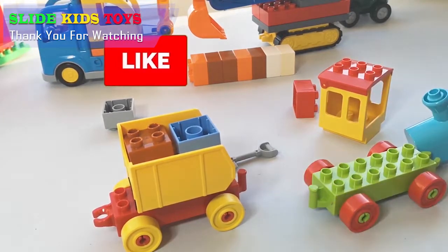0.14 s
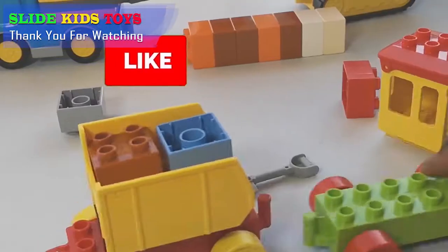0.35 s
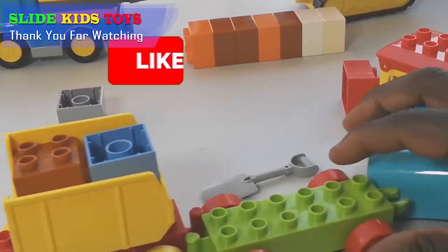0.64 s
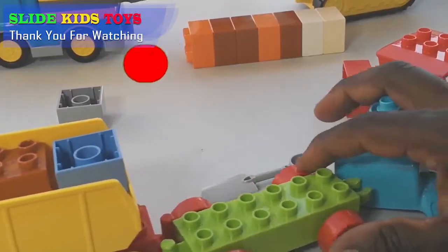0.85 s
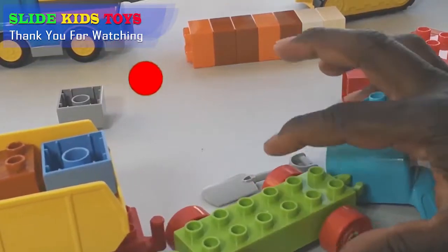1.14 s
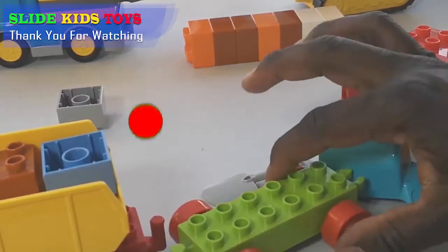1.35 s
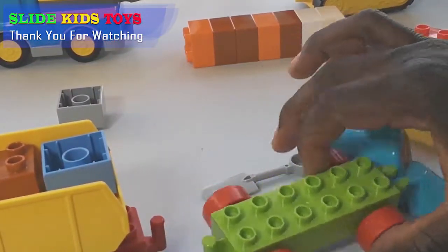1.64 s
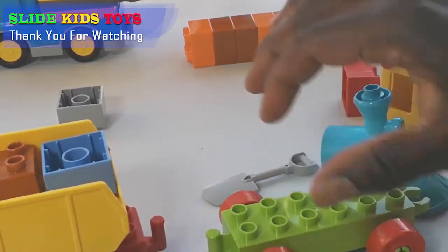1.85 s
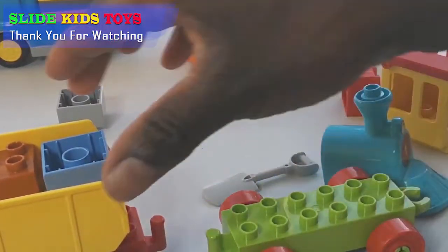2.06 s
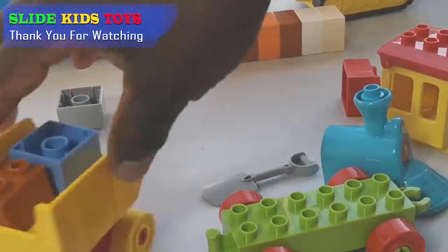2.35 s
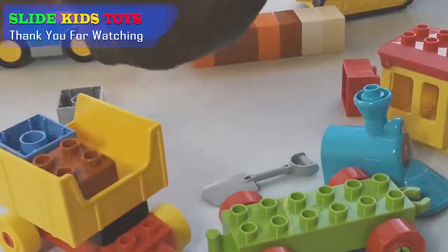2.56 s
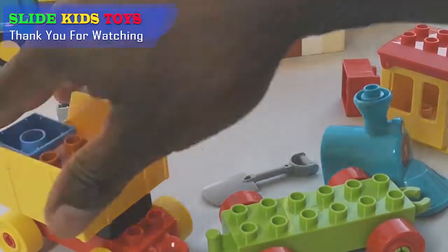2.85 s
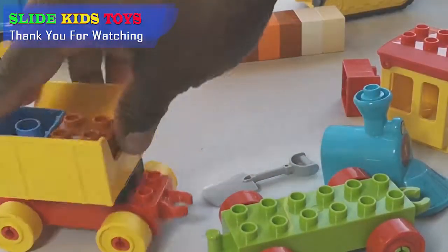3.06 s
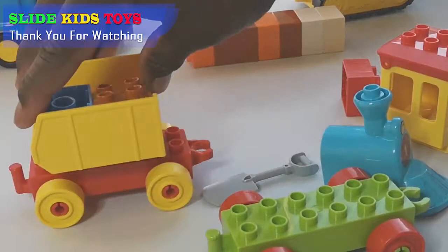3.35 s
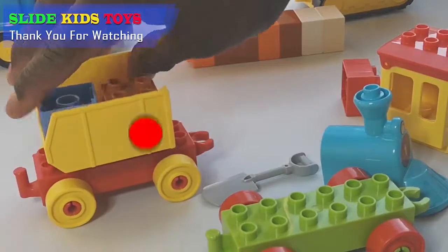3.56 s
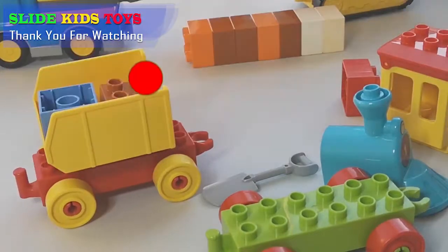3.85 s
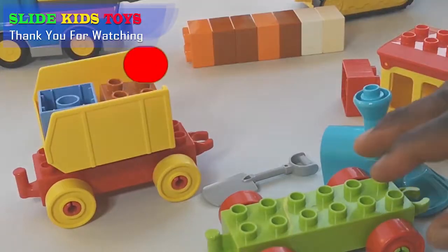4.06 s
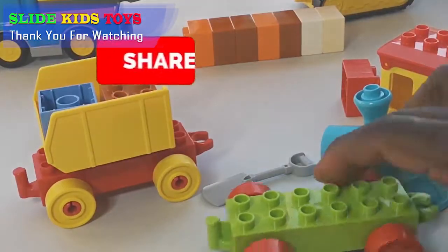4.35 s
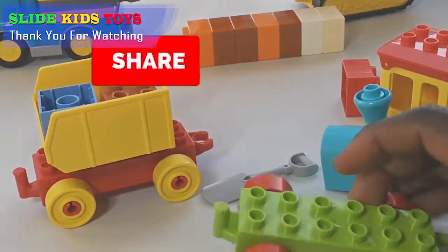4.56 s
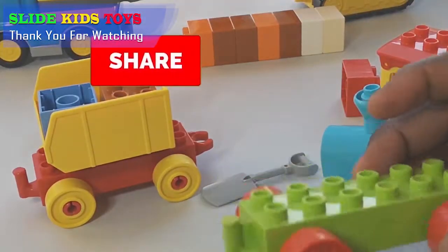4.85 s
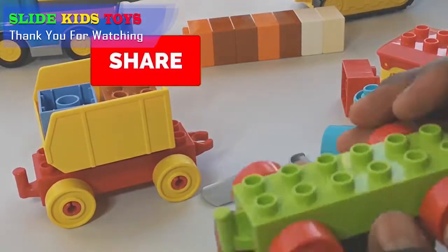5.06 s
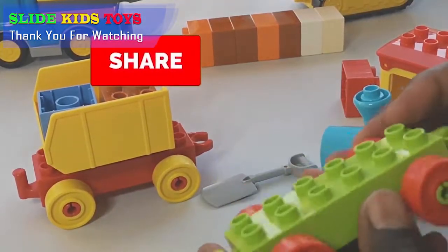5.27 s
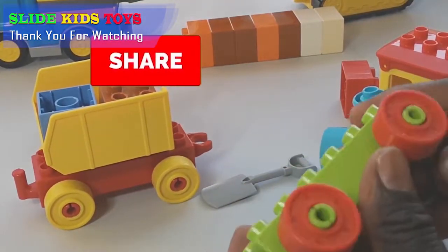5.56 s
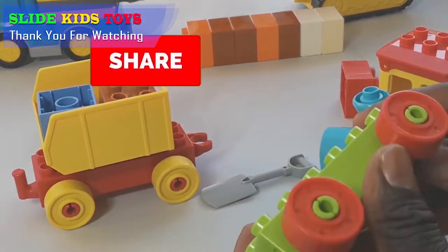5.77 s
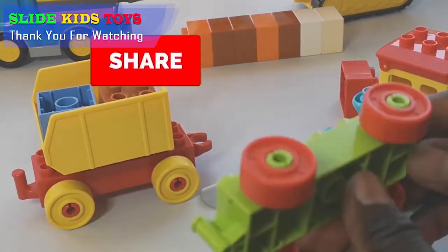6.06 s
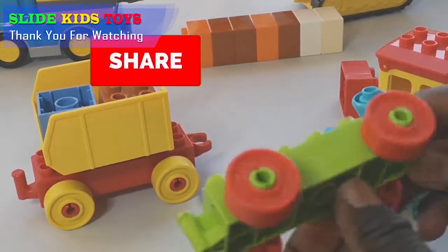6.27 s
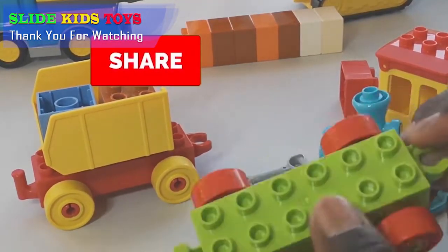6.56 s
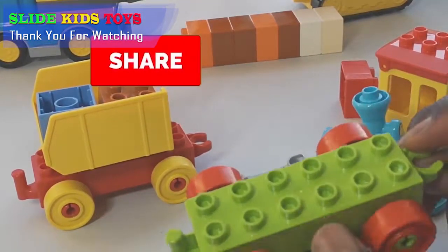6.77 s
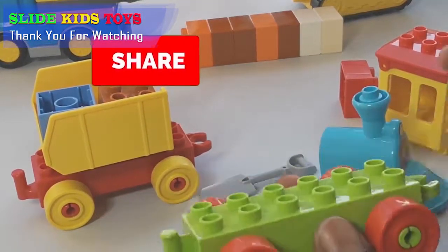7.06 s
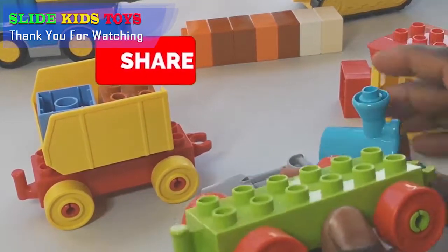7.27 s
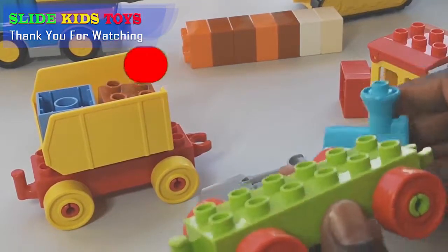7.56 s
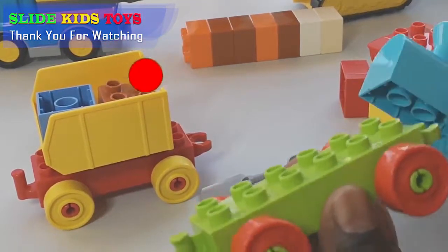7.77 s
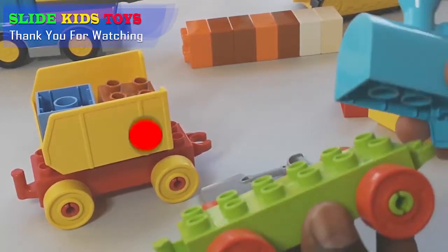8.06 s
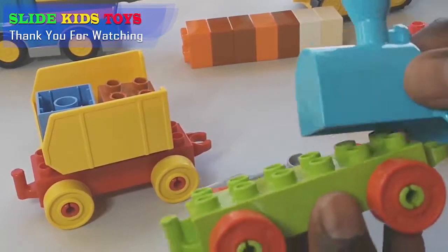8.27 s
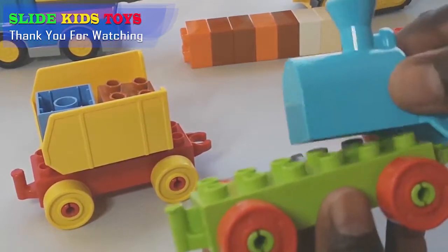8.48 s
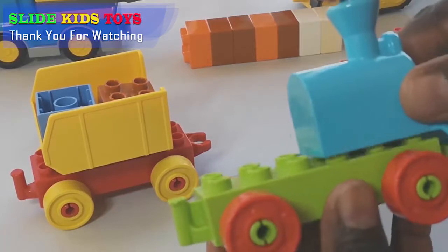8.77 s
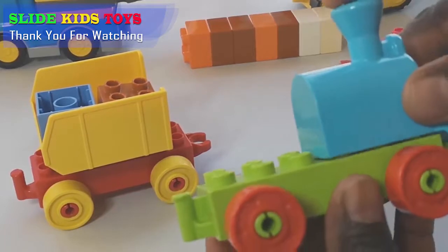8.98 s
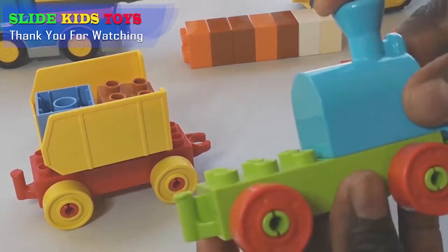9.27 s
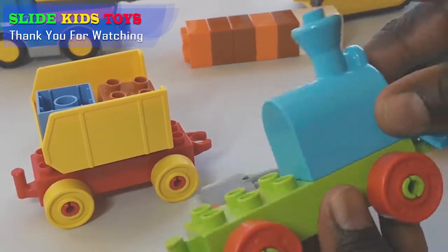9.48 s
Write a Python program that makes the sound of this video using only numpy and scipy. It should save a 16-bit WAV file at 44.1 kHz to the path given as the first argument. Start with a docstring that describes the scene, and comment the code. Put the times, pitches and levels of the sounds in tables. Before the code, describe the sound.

A tiny cut-off low thud, then silence for over half a second. Abruptly the room opens and hands handle hollow plastic toy pieces on a table: scrapes, sharp knocks and quick rattling clusters, pauses, then brighter clicks as pieces are turned and pressed together. Close stereo microphone, small room with short reflections, faint hiss and low rumble underneath.

```python
"""A cut-off thud, then silence until the sound opens on hands handling hollow plastic toy pieces.
They knock, turn and drag the pieces on a table in a small room, close to a pair of microphone ports.
Each knock rings the thin plastic walls; dragging feeds dense grit into walls and table top; fingertips rub.
A low rumble, a hiss and a faint wavering whine lie below."""
import sys
import numpy as np
from scipy import signal
from scipy.fft import rfft, irfft
from scipy.io import wavfile
from scipy.ndimage import map_coordinates

SR = 44100
rng = np.random.default_rng(int(sys.argv[2]) if len(sys.argv) > 2 else 0)


def generate_wav(sig):
    """Save sig (samples, or channels by samples) to the path in sys.argv[1] as 16-bit PCM at SR."""
    pcm = np.round(np.clip(np.atleast_2d(sig).T, -1, 1) * 32767).astype(np.int16)
    wavfile.write(sys.argv[1], SR, pcm)


N = 424683

# background hiss spectrum, relative: pitch_hz, density_db_per_hz
HISS_SPECTRUM = [(32, -32), (55, -19), (92, -21), (155, -11.5), (323, -40), (471, -33.5), (811, -33),
                 (1990, -31.5), (3850, -42), (6470, -45.5), (9000, -45.5), (12500, -60.5), (15500, -72.5)]
# left-right likeness of the hiss: pitch_hz, correlation
HISS_LIKENESS = [(60, 6), (180, 0.64), (550, -1), (1650, 0.13), (4970, -0.1), (15000, -0.3)]
# rumble level over time: time_s, rms_db
RUMBLE_LEVELS = [(0.63, -55.5), (3.26, -60), (4.54, -53.5), (7.15, -52.5), (7.4, -41.5), (7.6, -58),
                 (8.25, -46.5), (8.9, -53), (9.1, -51.5), (9.63, -58.5)]
# decay of the room: pitch_hz, t60_s
ROOM_DECAY = [(250, 0.05), (1500, 0.23), (5000, 0.25), (9000, 0.22), (14000, 0.23)]
# where the hands work: time_s, left_late_ms
HAND_PLACES = [(0.6, 0.068), (1.9, 0.055), (2.2, -0.2), (3.9, 0.053), (4.2, 0.16), (5.0, -0.059),
               (6.5, -0.0031), (7.2, 0.063), (9.6, 0.021)]
# modes of the plastic walls, undamped by hands: pitch_hz, level_db, t60_s
WALL_MODES = [(870, -37, 0.045), (1176, -39, 0.032), (1385, 7, 0.02), (1655, -9.5, 0.012),
              (2000, 10.5, 0.0082), (2519, -4, 0.26), (2833, -8.5, 0.29), (3198, 1.5, 0.26),
              (3460, -5, 0.067), (3850, 10, 0.014), (3977, 8, 0.023), (4300, -45, 0.0025), (5320, 0, 0.037),
              (5566, 9, 0.077), (5900, -12, 0.0283), (7750, -13, 0.0026), (7074, 12, 0.055),
              (8580, 9, 0.02), (11900, -13.5, 0.033)]
# modes of the table top, undamped by hands: pitch_hz, level_db (unused), t60_s
TABLE_MODES = [(115, -8.5, 0.61), (150, -7.5, 0.047), (224, -7, 0.05), (239, 2.8, 0.15), (294, 6.5, 0.37),
               (380.7, 4, 0.11), (473, -11.5, 0.031), (668, -25, 0.14), (868, -18, 0.021)]
# how hard grit drives each pitch, relative: pitch_hz, drive_db_per_hz
GRIT_DRIVE = [(90, -28), (236, -0.5), (325, -1.5), (543, -17), (1690, -6), (2710, -12), (7730, -17.5),
              (9800, -16), (15000, -28.5)]
# strokes of dragging, rolling and fingering, levels before trim:
# full_s (rise complete), hold_s, fade_db_per_s, walls_db, treble_db, table_db
STROKES = [(0.595, 0.007, 55, -35, -45.5, -41.5), (1.279, 0.022, 274, -36, -45.5, -41),
           (1.336, 0.13, 32, -63, -76, -49.5), (1.69, 0.076, 328, -45.5, -69, -38),
           (1.777, 0.0033, 600, -23, -35, -54), (1.81, 0.048, 492, -44.5, -46.5, -40.5),
           (1.968, 0.084, 282, -75, -57, -82), (2.294, 0.18, 304, -37.5, -46, -38),
           (2.515, 0.053, 302, -30.5, -36.5, -35.5), (2.6, 0.067, 706, -39.5, -55, -42),
           (2.95, 0.095, 312, -50, -51, -55), (3.023, 0.15, 139, -39.5, -44.5, -41.5),
           (3.303, 0.071, 408, -57, -62, -45), (3.474, 0.042, 144, -40, -43, -41),
           (4.276, 0.0032, 236, -46.5, -58, -49.5), (4.368, 0.051, 300, -46.5, -60, -55),
           (4.49, 0.012, 154, -43, -63, -44.5), (5.396, 0.088, 252, -63, -54, -63.5),
           (6.051, 0.067, 250, -63, -56, -69), (6.236, 0.011, 149, -61, -54.5, -62),
           (6.474, 0.043, 200, -63, -66, -90), (6.876, 0.097, 254, -51, -55, -71),
           (7.242, 0.019, 197, -52, -53.5, -41), (7.426, 0.025, 300, -43, -45, -66),
           (7.494, 0.053, 495, -67, -63, -46.5), (9.514, 0.0043, 204, -51.5, -45.5, -52.5)]
# strokes that swell in slowly: same columns
SWELLS = [(2.439, 0.018, 300, -30, -35, -54), (3.16, 0.031, 124, -42, -49, -34.5),
          (4.47, 0.016, 301, -40.5, -51, -55), (7.456, 0.0089, 260, -40, -46.5, -40)]
# hands resting on the pieces, before trim: walls_db, treble_db, table_db
RESTING_DB = [-73.5, -81.5, -67.5]
# fingertip rubs on smooth plastic: peak_s, fade_db_per_s, level_db
RUBS = [(9.13, 121, -68), (9.508, 166, -46)]
# knocks, level before trim:
# start_s, peak_db, panel_pitch_hz, panel_re_walls_db, high_modes_db, left_re_right_db
KNOCKS = [(0.87, -48.5, 3600, 19, -15, 16.5), (1.136, -35.5, 1950, 18.5, -20, 1),
          (1.258, -24, 2540, 8, -14.5, 2), (1.2771, -26, 1180, 15, -3, 7), (1.399, -37, 2430, 17, -14, 7.5),
          (1.4296, -32, 2520, 15, -31, -1), (1.5079, -33.5, 2560, 20, -11, 3),
          (1.6847, -25, 1860, 7, -14.5, 7), (1.723, -19, 1650, -5, -26, 1.5),
          (1.734, -31.5, 2500, -5, -9, 8), (1.7735, -12, 1610, -5, -9, -6.5),
          (2.435, -38, 1360, -4, -26, -2.5), (2.5224, -14.5, 2270, 9, -13.5, 9.5),
          (2.661, -33.5, 2270, 11.5, -31, 15), (2.9522, -43, 2240, -1, -38, 28),
          (3.022, -34.5, 2350, 1, -5, 17), (3.028, -31, 2300, 15, -16, -5), (3.037, -33, 2430, 21, -14, 8),
          (3.0625, -19.5, 4160, 13, -6.5, 7), (3.071, -27, 3050, 7, -12, 6),
          (3.4428, -41, 2300, -5, -26, 8.5), (3.467, -32, 2400, -7, -14, 5),
          (3.477, -19, 2460, 10, 1, 20.5), (3.487, -25, 1530, 3.5, -8, 16), (3.519, -23, 1780, 6, -43, 13),
          (3.5684, -35.5, 1630, 1, -13, 16), (3.5916, -31, 2200, 6, -33, 10), (3.623, -36, 1700, 3, -19, 0),
          (3.6543, -35.5, 1830, 8.5, -26, 1), (4.268, -32.5, 2290, 2, -39, 8.5),
          (4.367, -26, 2300, 22, -42, 0), (4.471, -42, 1310, 22, -7, -13), (4.5258, -30.5, 1400, 0, -16, 2),
          (4.573, -35, 1930, 18, -7.5, 10), (4.737, -46, 2540, 25, -13, 6),
          (4.9685, -20, 2430, 7, -20.5, -1), (5.036, -31.5, 2300, 6, -5, 5),
          (5.0473, -27.5, 2600, 12, -18, -4), (5.209, -45.5, 1464, -5, -23, 0),
          (5.42, -19, 1500, 25, 11.5, 1.5), (5.5091, -42, 1840, 1, -15, 0),
          (5.5709, -22, 3140, 10, 27, -0.5), (6.0466, -47, 2900, 18.5, -30, -5),
          (6.094, -26, 2910, 26, 0, 1.5), (6.159, -43.5, 2780, 12, -15, 6), (6.2184, -45, 3020, 4, -24, 7),
          (6.24, -43.5, 2920, 0, 11, 7), (6.479, -45, 2770, -2, -43, 4), (6.529, -44, 2580, 9, -28, 4),
          (6.6278, -13, 2650, 25, -9, 1), (6.8374, -23, 2690, 42, 18, 1),
          (6.8654, -34.5, 2700, 20, -17, 14), (6.884, -19.5, 2630, 11, -8.5, 0),
          (6.9147, -25, 2570, 20, -13, 0), (6.9368, -20, 2630, 11, -20, 2), (6.963, -37, 2600, 13, -2, 3),
          (6.989, -31.5, 2540, 5, -1.5, 9), (7.0008, -31.5, 2340, -4, -22, 1),
          (7.218, -43.5, 3030, 11, -20, 4), (7.245, -34, 1336, -12, -46, 3), (7.465, -30, 1416, 15, -21, 2),
          (7.539, -41.5, 2040, 14, -21, 15), (7.5627, -45, 3300, 0, -20, 1), (7.622, -32, 2570, 12, -8, 1),
          (7.7468, -41.5, 2600, 12, -15, 2), (7.903, -38, 2280, 17, -9, 1.5),
          (7.9457, -26, 2450, 6, -8.5, -1), (8.5785, -37.5, 2000, 12, -24, -2),
          (8.6074, -29.5, 1650, 8.5, -23.5, 0), (8.778, -46, 1970, 5, -20, 2),
          (8.798, -33, 1570, 10, -16, -2), (8.8189, -19.5, 1900, 16, -11.5, -6.5),
          (8.831, -27.5, 1800, 4, -4, 0), (8.8405, -36, 1750, 1, 12, 4.5), (9.507, -33.5, 2030, 2, -2, 6),
          (9.597, -32, 2160, 14, -7, 2.5)]
# second panel ringing along with a knock: knock_s, pitch_hz, re_walls_db
SECOND_PANELS = [(1.429, 1433, 12), (1.685, 3980, 9), (1.723, 2710, 3), (1.773, 2520, 4), (2.523, 1570, 1),
                 (3.063, 3160, -6), (3.477, 5840, 22), (3.487, 2520, 13), (4.367, 1520, 1),
                 (4.367, 3910, 11), (4.574, 1630, 11), (4.969, 3310, 1), (4.969, 4200, 6), (5.42, 3400, 12),
                 (5.571, 5060, 39), (6.094, 6020, 27.5), (6.627, 5260, 10), (6.837, 5600, 42),
                 (6.937, 3290, -1), (7.946, 3050, 10.5), (8.578, 1120, 2), (8.608, 1160, -2),
                 (8.608, 3300, 0), (8.798, 3270, 4.5), (9.597, 924, 11.5), (9.597, 3620, 24)]

HISS_DB, WHINE_DB, WHINE_HZ = -63.5, -76.5, 2178
RUMBLE_HZ, RUMBLE_WIDTH_HZ = 37, 16
THUD_HZ, THUD_PEAK_DB = 78, -25
CUT_S, OPEN_S = .0143, .6305   # thud ends, sound opens
ROOM_DB = -5
CAPSULE_HZ = 8940   # microphone capsule falls off above
STOPBAND_HZ = 15900
RISE_DB_PER_S, SWELL_DB_PER_S = 897, 306   # onset of strokes and rubs, of swells
RUB_BAND_HZ = (8000, 15000)
DRAG_CYCLES = 55   # cap on mode t60 in drags, before the hand halves it
GRIP_LOW, GRIP_HIGH = .35, .16   # share of t60 the fingers leave to low, high wall modes
PANEL_T60_S, PANEL_KNEE_HZ = .025, 1800   # panels above the knee ring shorter in proportion
CRACK_DB, SCATTER_DB = 0, 2   # dry crack re ringing; chance in mode strength
CLUSTER, CLUSTER_SPREAD = 3, .09   # close modes per wall mode; spread as share of pitch
MUFFLE_DB = 6   # grip weakens low wall modes of a knock
DULL_DB = 35   # lack of high modes that would take all treble from the crack (capped at .8 of it)


def from_db(db):
    """Gain of a level."""
    return 10 ** (np.asarray(db) / 20)


def rms_one(x):
    """Scale to rms 1."""
    return x / np.sqrt(np.mean(x ** 2) + 1e-20)


def in_time(rows):
    """Columns of a table as curves at every sample."""
    s, *columns = np.transpose(rows)
    return [np.interp(np.arange(N) / SR, s, c) for c in columns]


def at_hz(points, hz):
    """A spectrum read on a log-frequency axis."""
    points_hz, values = np.transpose(points)
    return np.interp(np.log(hz), np.log(points_hz), values)


def drift(rate_hz):
    """Slow chance of rms 1: low-passed noise, drawn every 40 samples."""
    r = np.exp(-80 * np.pi * rate_hz / SR)
    noise = rng.standard_normal(N // 40 + 2002)
    slow = signal.lfilter([1], [1, -2 * r, r * r], noise)[2000:]
    return np.interp(np.arange(N) / 40, np.arange(len(slow)), rms_one(slow))


def ring(force, hz, t60_s):
    """Two-pole resonator: a unit click starts a decaying sine of height 1."""
    r, w = from_db(-60 / (t60_s * SR)), 2 * np.pi * hz / SR
    return signal.lfilter([0, np.sin(w)], [1, -2 * r * np.cos(w), r * r], force + 1e-18)


def band(x, hz, kind="band", order=2):
    """Butterworth filter."""
    return signal.sosfilt(signal.butter(order, hz, kind, fs=SR, output="sos"), x)


def bands():
    """Half-octave band filters with their centres in Hz."""
    edges = 50 * 2 ** np.arange(0, 8.6, .5)
    return [(signal.butter(2, [a, b], "band", fs=SR, output="sos"), np.sqrt(a * b))
            for a, b in zip(edges, edges[1:])]


def background(whine_waver_db=4.0):
    """Hiss alike in the bass only, a narrow rumble of changing level, a wavering thin whine."""
    hiss, white = 0, rng.standard_normal((2, 2, N))
    for k, (sos, hz) in enumerate(bands()):
        mid, side = signal.sosfilt(sos, white[k % 2])
        alike = np.clip(at_hz(HISS_LIKENESS, hz), -1, 1)
        pair = np.sqrt(1 + alike) * mid + np.sqrt(1 - alike) * side * [[1], [-1]]
        hiss = hiss + from_db(at_hz(HISS_SPECTRUM, hz)) * pair
    t60_s = 2.2 / RUMBLE_WIDTH_HZ
    rumble = ring(ring(rng.standard_normal(N), RUMBLE_HZ, t60_s), RUMBLE_HZ, t60_s)
    rumble = from_db(in_time(RUMBLE_LEVELS)[0]) * rms_one(rumble)
    tone = np.sin(2 * np.pi * WHINE_HZ * np.arange(N) / SR + .6 * drift(3.8))
    whine = from_db(whine_waver_db * drift(4.0)) * tone
    return from_db(HISS_DB) * rms_one(hiss) + rumble + from_db(WHINE_DB) * rms_one(whine)


def cut_thud():
    """A low sine, broken off."""
    t = np.arange(N) / SR
    return from_db(THUD_PEAK_DB) * np.sin(2 * np.pi * THUD_HZ * (t - .0034)) * (t < CUT_S)


def room(x, onset_ms=1.0):
    """Diffuse echoes, alike at both ports only in the bass, where they die fastest."""
    t, tail = np.arange(SR // 2) / SR, 0
    white = rng.standard_normal((2, 2, len(t)))
    for k, (sos, hz) in enumerate(bands()):
        decay = from_db(-60 * t / at_hz(ROOM_DECAY, hz))
        mid, side = signal.sosfilt(sos, white[k % 2]) * decay
        tail = tail + mid + side * np.clip(hz / 500, 0, 1) ** 2 * [[1], [-1]]
    tail = tail * (1 - np.exp(-(t * 1000 / onset_ms) ** 2))
    tail = tail / np.sqrt((tail ** 2).sum(1, keepdims=True))
    return signal.fftconvolve(x, tail, axes=1)[:, :N]


def ports(pair):
    """The two ports hear the hands at slightly different times."""
    half, at = in_time(HAND_PLACES)[0] * SR / 2000, np.arange(N)   # half the delay, samples
    left = map_coordinates(pair[0], [at - half], order=3)
    right = map_coordinates(pair[1], [at + half], order=3)
    return np.array([left, right])


def port_turn(hz, spread_rad=.55, full_hz=300):
    """Modes radiate from their own spots: spread of half the phase between ports, less in the bass."""
    return spread_rad * np.clip(hz / full_hz, 0, 1) ** 2


def rubs():
    """Skin slipping on a smooth face hisses high, sets in fast and fades."""
    t, gain = np.arange(N) / SR, 0
    for s, fade, db in RUBS:
        gain = gain + from_db(db + np.minimum(RISE_DB_PER_S * (t - s), fade * (s - t)))
    return gain * rms_one(band(rng.standard_normal((2, N)), RUB_BAND_HZ))


def pressure():
    """Each stroke rises, holds and fades; gains for walls, treble and table top."""
    t, power = np.arange(0, N + 64, 64) / SR, from_db(RESTING_DB)[:, None] ** 2
    for rise, rows in [(RISE_DB_PER_S, STROKES), (SWELL_DB_PER_S, SWELLS)]:
        for s, hold, fade, *levels_db in rows:
            shape_db = np.minimum(0, np.minimum(rise * (t - s), fade * (s + hold - t)))
            power = power + from_db(np.add.outer(levels_db, shape_db)) ** 2
    return [np.interp(np.arange(N) / SR, t, np.sqrt(p)) for p in power]


def drags(grit_per_s=2000, size_db=2.5, judder_db=1.0, patchy_db=3.5, pan_db=0.5, trim_db=-3):
    """Grit under sliding plastic ticks densely into every mode, unevenly; the hand halves the ringing."""
    size = from_db(size_db * np.minimum(rng.exponential(1, (3, N)), 5))
    grit = (rng.random((3, N)) < grit_per_s / SR) * size * rng.choice([-1, 1], (3, N))
    walls, treble, table = parts = np.zeros((3, 2, N))
    for k, (hz, _, t60_s) in enumerate(WALL_MODES + TABLE_MODES):
        late = round(port_turn(hz) * rng.standard_normal() * SR / (np.pi * hz))
        t60_s = min(t60_s, DRAG_CYCLES / hz)
        drive = from_db(at_hz(GRIT_DRIVE, hz)) * from_db(patchy_db * drift(20))
        # short rings are wide: / t60_s gives the same height per Hz
        mode = drive * ring(grit[k % 3], hz, t60_s / 2) / t60_s
        part = table if k >= len(WALL_MODES) else treble if hz > 2700 else walls
        part += [mode, np.roll(mode, late)]
    parts[0] = band(walls, [1000, 2800])
    parts[1] = band(treble, 2600, "high")
    mix = 0
    for gain, part in zip(pressure(), parts):
        mix = mix + from_db(judder_db * drift(28)) * gain * rms_one(part)
    return from_db(trim_db + np.array([[pan_db], [-pan_db]])) * mix


def contact_force(chance, u):
    """Chattering contact, its spectrum evened out to a crack of even colour."""
    chatter = rfft(chance * u ** 2 * np.exp(-u))
    size = np.abs(chatter)
    return irfft(chatter / (size + size.mean() / 3)) * u * np.exp(-u / 2)


def knocks(below_db_oct=-14, above_db_oct=-12, trim_db=1.5, contact_ms=1.0, thin=0.73):
    """A brief contact rings touched panels and finger-damped wall modes, and cracks drily."""
    out, t = np.zeros((2, N + SR)), np.arange(SR // 24) / SR
    # the last entry is the touched panel
    wall_hz, mode_db, t60_s = np.transpose(WALL_MODES * CLUSTER + [(1, 0, PANEL_T60_S)])
    t60_s[:-1] *= np.where(wall_hz[:-1] > 3000, GRIP_HIGH, GRIP_LOW)
    count = len(t60_s)
    u = t[:512] * 1000 / contact_ms
    for s, peak_db, panel_hz, panel_db, high_db, pan_db in KNOCKS:
        scatter, phase, detune = rng.standard_normal((3, count))
        # grip and piece shift the modes
        hz = np.append(wall_hz[:-1] * (1 + CLUSTER_SPREAD * detune[:-1]), panel_hz)

        # low modes weaken away from the panel pitch
        octaves = np.log2(hz / panel_hz)
        away_db = np.where(octaves > 0, above_db_oct, below_db_oct) * np.abs(octaves)
        level_db = mode_db + SCATTER_DB * scatter
        level_db += np.where(wall_hz > 3200, high_db, away_db - MUFFLE_DB)
        level_db[-1] += panel_db

        also = [row[1:] for row in SECOND_PANELS if abs(row[0] - s) < .004]
        also_hz, also_db = np.reshape(also, (-1, 2)).T
        hz, level_db = np.append(hz, also_hz), np.append(level_db, also_db)
        phase = np.append(phase, phase[:len(also)])
        panels_hz = hz[count - 1:]
        panels_t60_s = PANEL_T60_S * np.minimum(1, PANEL_KNEE_HZ / panels_hz)
        decay = np.log(1000) / np.append(t60_s[:-1], panels_t60_s)

        force = contact_force(rng.standard_normal(512), u)
        # even out what the force holds of each pitch
        reach = np.abs(np.exp(-2j * np.pi * hz[:, None] * t[:512]) @ force)
        gain = from_db(level_db) / np.maximum(reach, reach.mean() / 2)
        turn = np.exp(1j * port_turn(hz) * phase)
        rings = gain * [turn, 1 / turn] @ np.exp(np.outer(2j * np.pi * hz - decay, t))
        pair = signal.fftconvolve(rings.imag, force[None], axes=1)

        dull = np.clip(-high_db / DULL_DB, 0, .8)   # fewer high modes, duller crack
        crack = signal.lfilter([1 - dull], [1, -dull], force) / np.abs(force).max()
        pair[:, :512] += from_db(CRACK_DB + min(high_db, 0)) * np.abs(pair).max() * crack
        # a small panel radiates little below its pitch
        pair = band(pair, thin * panels_hz.min(), "high", 6)
        at = round(s * SR)
        sides_db = peak_db + trim_db + np.array([[pan_db / 2], [-pan_db / 2]])
        out[:, at:at + pair.shape[1]] += from_db(sides_db) * pair / np.abs(pair).max()
    return out[:, :N]


def scene():
    """Cut thud, silence, then toys in the room over the background."""
    toys = ports(knocks() + drags() + rubs())
    toys = toys + from_db(ROOM_DB) * room(toys.mean(0)[None])
    toys = band(toys, CAPSULE_HZ, "low", 3)
    is_open = np.arange(N) / SR >= OPEN_S
    return (toys + background()) * is_open + cut_thud()


def record(dry):
    """Steep low-pass, 60 dB down from STOPBAND_HZ up."""
    return signal.sosfilt(signal.cheby2(16, 60, STOPBAND_HZ, fs=SR, output="sos"), dry)


dry = scene()
out = record(dry)
generate_wav(out)
```